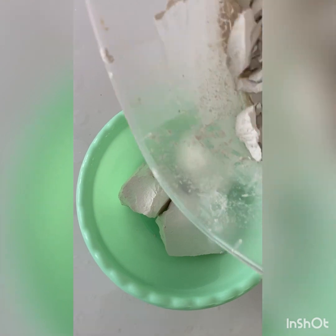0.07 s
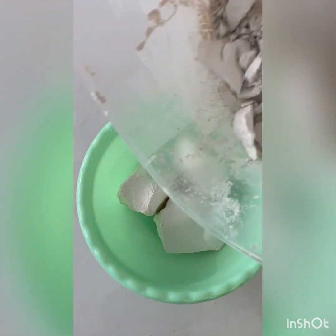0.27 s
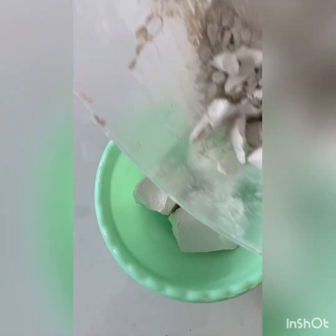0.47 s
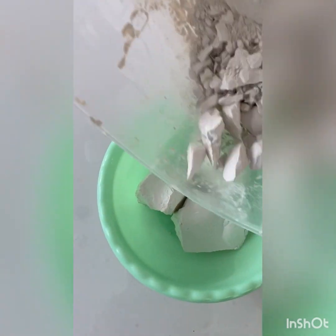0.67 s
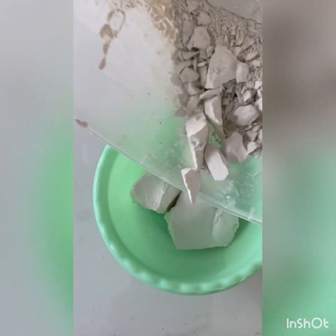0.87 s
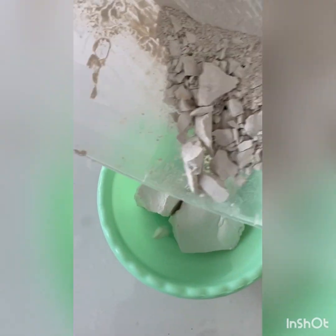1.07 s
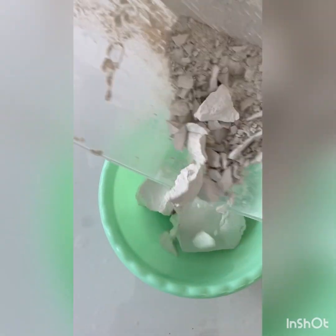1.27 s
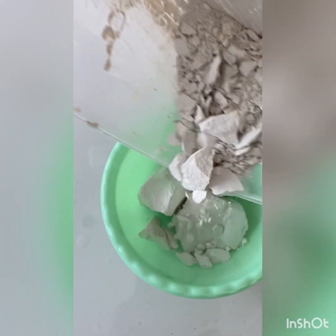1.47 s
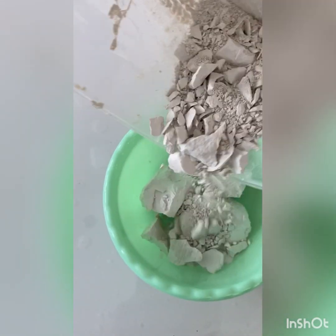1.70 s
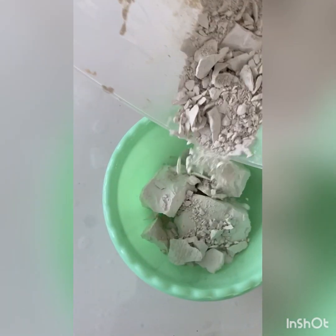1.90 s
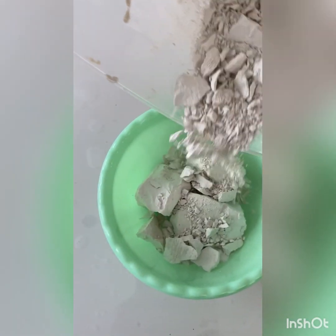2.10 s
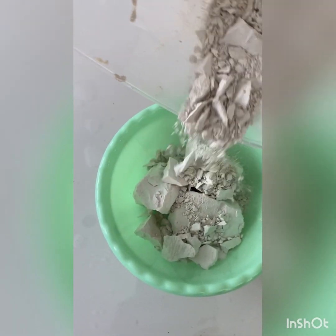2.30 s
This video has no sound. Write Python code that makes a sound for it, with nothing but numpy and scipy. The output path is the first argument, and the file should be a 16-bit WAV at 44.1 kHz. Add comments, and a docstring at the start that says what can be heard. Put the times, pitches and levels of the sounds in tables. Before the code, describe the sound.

Chalk pours into a plastic bowl, close to the microphone in a small room. Hollow knocks and gritty scrapes come first, then a dull thud and a busier clatter of pieces, ending with light ticking chips.

```python
"""Dry chalk pieces slide out of a tilted plastic tub and tumble into a plastic bowl, close by.
Lumps knock on the tub wall, where high notes travel faster than low ones, and one big lump thuds
into the bowl. Chalk clinks on chalk, small pieces rattle and scrape over the plastic, and tiny
chips tick onto the heap. A stereo microphone hears it all in a small room."""
import sys
import numpy as np
from scipy import signal
from scipy.fft import rfft, irfft
from scipy.io import wavfile
from scipy.ndimage import uniform_filter1d

SR = 44100
rng = np.random.default_rng(int(sys.argv[2]) if len(sys.argv) > 2 else 0)


def unload_audio(sound):
    """Save the sound as a 16-bit wav file, at the path given as the first command line argument."""
    columns = np.transpose(np.atleast_2d(sound))
    # keep every value between -1 and 1, then stretch to whole-number steps
    steps = np.round(np.clip(columns, -1, 1) * 32767)
    wavfile.write(sys.argv[1], SR, steps.astype(np.int16))


N = 108045

# The plastic's low and middle notes. Each row: pitch in Hz, seconds to fade by 60 dB, level in dB.
# All levels in the tables are relative: they set the balance between rows.
BOOM_NOTES = [(166.3, 0.084, -11.5), (351, 0.022, 1), (467, 0.01, 3)]
WALL_NOTES = [(622.5, 0.021, -6), (874, 0.017, -0.5), (970, 0.016, -6)]
# Where small pieces and finer crumbs ring. Each row: pitch in Hz, rough width in Hz, level in dB.
PIECE_BANDS = [(1412, 576, 4.5), (2112, 134, 5.5), (3314, 1110, 6.5), (4200, 920, -10.5)]
CRUMB_BANDS = [(5576, 484, 3), (7040, 1700, 0), (7790, 1530, -7), (8830, 2250, -2), (12300, 5200, -3),
               (13860, 950, -9)]
BEND_S = 0.003026  # travel time of a 1000 Hz ripple through the plastic


def knocks():
    """Lumps hit the tub: a crack, then the wall's clack, middle tone and boom in a quick fall."""
    # Each row: start in seconds, levels of boom, wall, clack and crack in dB, wall pitch in Hz.
    hits = [(0.2062, -15, -15.5, -38, -38, 810), (0.2476, -21, -20, -23, -28, 890),
            (0.2835, -23.5, -26, -27, -41, 770), (0.35, -38, -26, -19, -29, 920),
            (0.3748, -18.5, -11, -10, -17.5, 944), (0.4435, -44, -13.5, -28, -41, 845),
            (0.459, -29.5, -18, -23, -39, 850), (0.4805, -22, -3, -14, -10.5, 877),
            (0.498, -30, -10.5, -8, -21, 965), (0.526, -19.5, -7, -15.5, -31, 860),
            (0.539, -25, -19, -17, -21, 960), (0.564, -16.5, -5, -10.5, -27, 776),
            (0.5989, -23, -6.5, -17.5, -18, 932), (0.645, -17, -8.5, -19, -31, 1000),
            (0.675, -20, -10, -15, -25, 844), (0.8078, -16.5, -8.5, -16, -29, 900),
            (0.9185, -19.5, -17, -24, -28, 860), (0.947, -19.5, -26, -50, -44, 785),
            (1.0151, -18.5, -22.5, -46, -47, 840), (1.0538, -25, -10.5, -14.5, -15, 957),
            (1.1417, -18, -10, -25, -41, 875), (1.1599, -34, -16.5, -21, -18, 864),
            (1.3368, -27, -11.5, -33, -12.5, 872), (1.3555, -27, -8, -13, -11.5, 818),
            (1.5811, -27.5, -20.5, -18, -11.5, 930), (1.8, -27.5, -31, -17, -8, 1010),
            (1.8043, -38, -20.5, -30.5, -16, 1070), (1.9931, -27.5, -24, -38, -38, 760),
            (2.411, -47, -27, -23.5, -22.5, 930), (2.416, -34, -29, -23, -24.5, 870)]
    # The plastic's high notes. Each row: pitch in Hz, fade time in seconds, level in dB.
    clack_notes = [(1550, 0.0086, -0.5), (2040, 0.006, -1), (2530, 0.0034, 1)]
    # Where the crack rings. Each row: pitch in Hz, rough width in Hz, level in dB.
    snap_bands = [(3390, 1000, 12.5), (5620, 1500, 7), (6940, 1500, 5), (13600, 14000, -3)]
    cracks, ripples = np.zeros((2, N)), np.zeros((2, N))
    for start, boom_db, wall_db, clack_db, crack_db, wall_hz in hits:
        snap = resonate(crack(low_hz=1750, fade_s=0.0091), snap_bands)
        add(cracks, start, pan(undb(crack_db + 2.5) * snap))
        # Each spot on the wall has its own pitch.
        spot_notes = [(hz * wall_hz / WALL_NOTES[1][0], fade_s, db) for hz, fade_s, db in WALL_NOTES]
        for notes, db in (BOOM_NOTES, boom_db + 6), (spot_notes, wall_db + 1.5), (clack_notes, clack_db + 2.5):
            strike(ripples, start - .0007, notes, undb(db), detune=.04, scatter_db=1)
    return cracks + through_plastic(ripples)


def thud():
    """The big lump lands and shakes the whole bowl; the deepest notes arrive last."""
    # The bowl's notes. Each row: pitch in Hz, fade time in seconds, level in dB.
    bowl_notes = [(87, 0.059, -11), (121, 0.039, 4.5), (156, 0.063, -4.5), (271, 0.0283, -1),
                  (466, 0.011, -0.5), (794, 0.015, -8.5)]
    out = np.zeros((2, N))
    for hz, fade_s, db in bowl_notes:
        add(out, start=1.098, sound=2 * undb(db + 6) * ring(hz, fade_s, rise_cycles=0.78))
    return through_plastic(out)


def clinks():
    """Chalk hits chalk: it cracks, rings briefly, and its rough face touches again at once."""
    # Each row: start in seconds, pitch in Hz, ring level in dB, crack level in dB.
    hits = [(0.1125, 5100, -27, -25), (0.148, 5050, -24, -21), (0.2769, 3950, -23, -25),
            (0.3172, 2920, -30, -32), (0.5979, 3630, -9, -13.5), (0.6872, 3360, -30, -12.5),
            (1.0709, 6870, -21.5, -29), (1.198, 3060, -20, -36), (1.2175, 2180, -20, -17.5),
            (1.26, 3130, -24, -9.5), (1.3381, 3360, -3, -6.5), (1.3558, 3540, -6.5, -3.5),
            (1.3667, 7430, -19, -28), (1.4069, 3100, -7.5, -5.5), (1.409, 6800, -14, -9),
            (1.417, 7550, -15.5, -9), (1.4456, 3320, -27, -10.5), (1.47, 3610, -7, -16),
            (1.4927, 3640, -7, -17), (1.5288, 3470, -14.5, -39), (1.5804, 7500, -13, -7.5),
            (1.659, 3670, -12, -17), (1.6668, 3580, -16, -27), (1.707, 3830, -15, -24),
            (1.71, 3400, -14, -17), (1.7192, 3920, -19, -22), (1.728, 3570, -15, -20),
            (1.7817, 7430, -10.5, -10), (1.787, 7570, -22, -12), (1.8045, 2020, -12, -26),
            (1.825, 3370, -21, -14)]
    ring_s, crack_s, chatter_delay_s = 0.0088, .007, 0.00098
    out = np.zeros((2, N))
    for start, hz, ring_db, crack_db in hits:
        notes = [(hz, ring_s, 0), (hz * 1.104, ring_s * 0.85, -7), (hz * 3.3, ring_s / 2, -28)]
        strike(out, start, notes, undb(ring_db + 1.5), detune=0.01, scatter_db=-0.5)
        add(out, start, pan(undb(crack_db - 1) * crack(low_hz=1880, fade_s=crack_s)))
        chatter = resonate(crack(low_hz=2800, fade_s=crack_s), [(hz, hz * 0.36, 0)])
        add(out, start + chatter_delay_s, pan(3 * undb(ring_db - 2) * chatter))
    return out


def stream():
    """Pouring chalk rattles the plastic while small pieces and crumbs click against each other."""
    # Strength of the pour. Each row: time in seconds, levels of rattle, pieces and crumbs in dB.
    flow = [(0, -43, -47, -50.5), (.1, -35.5, -42.5, -50.5), (0.158, -30.5, -29.5, -40),
            (.3, -32.5, -35, -40.5), (.42, -28, -30.5, -40.5), (.55, -30.5, -32.5, -40),
            (.74, -29.5, -34.5, -41), (.9, -26, -33, -41.5), (.97, -35, -37.5, -41), (1.08, -19, -28, -35),
            (1.2, -23, -27.5, -36), (1.252, -24.5, -30, -42), (1.37, -23.5, -25.5, -33),
            (1.5, -27.5, -30, -36), (1.62, -29, -32, -35), (1.75, -36, -33, -35.5), (1.9, -35, -34, -39),
            (2.05, -33.5, -35, -38.5), (2.2, -33.5, -36.5, -40.5), (2.34, -38.5, -41.5, -40.5),
            (2.45, -32, -40, -46.5)]
    times, *levels = np.array(flow).T
    t = np.arange(N) / SR
    contacts = crunch(per_s=520, spread_db=4.5)
    drumming = undb(1.5) * rattle(per_s=420, spread_db=2.2)
    pieces = undb(2) * steady(resonate(contacts, PIECE_BANDS))
    crumbs = undb(5.5) * steady(resonate(contacts, CRUMB_BANDS))
    layers = drumming, pieces, crumbs
    pour = sum(layer * undb(np.interp(t, times, db)) for layer, db in zip(layers, levels))
    # The heap catches for a moment before the big lump falls.
    stall_db = -18 * np.exp(-((t - 1.036) / 0.017) ** 2)
    return undb(stall_db) * pour


def rattle(per_s, spread_db):
    """Many small pieces drum on the plastic at random times."""
    # The bowl's slow flexing. Each row: pitch in Hz, fade time in seconds, level in dB.
    flex_notes = [(79.6, 0.12, -13), (120.8, 0.14, -14.5), (164.4, 0.11, -9.5)]
    notes = flex_notes + [(hz, fade_s, db + 1) for hz, fade_s, db in BOOM_NOTES] + WALL_NOTES
    out = np.zeros((2, N))
    for when, size in rng.random((int(per_s * N / SR), 2)):
        gain = undb(spread_db * min(-np.log(1 - size), 3.5))
        strike(out, when * N / SR, notes, gain, detune=0.098, scatter_db=5.0, bend_s=BEND_S)
    return steady(out)


def crunch(per_s, spread_db):
    """Brittle grains touch at random, mostly softly, over a hiss of dust."""
    grains = np.zeros((2, N))
    for when, size in rng.random((int(per_s * N / SR), 2)):
        gain = undb(spread_db * min(-np.log(1 - size), 4))
        add(grains, when * N / SR, pan(gain * crack(low_hz=300, fade_s=.0055)))
    dust = undb(-5) * rng.standard_normal(N)
    return steady(grains) + dust


def slides():
    """The heap gives way in short, dense rushes of grit that also scrape the plastic."""
    # Each row: start in seconds, length in seconds, scrape level in dB, grit level in dB.
    rushes = [(0.231, 0.027, -23.5, -30), (0.346, 0.028, -23, -24.5), (0.45, 0.04, -17, -24.5),
              (0.52, 0.026, -22.5, -25), (0.627, 0.027, -23.5, -33), (0.662, 0.035, -22.5, -25),
              (0.999, 0.019, -24, -29.5), (1.045, 0.039, -32, -24), (1.148, 0.035, -17, -23.5),
              (1.257, 0.085, -24, -22.5), (1.588, 0.043, -28, -26), (1.975, 0.034, -26.5, -46),
              (2.249, 0.045, -28.5, -30)]
    # Where scraped plastic rings. Each row: pitch in Hz, rough width in Hz, level in dB.
    scrape_bands = [(389, 385, -2), (891, 210, 2)]
    attack_s, release_s = .003, .012
    contacts = crunch(per_s=900, spread_db=3.5)
    scrape = steady(resonate(contacts, scrape_bands))
    pieces = steady(resonate(contacts, PIECE_BANDS))
    crumbs = steady(resonate(contacts, CRUMB_BANDS))
    grit = steady(pieces + undb(0.5) * crumbs)
    t, out = np.arange(N) / SR, 0
    for start, length, scrape_db, grit_db in rushes:
        rise = np.clip((t - start) / attack_s, 0, 1)
        fall = np.clip((start + length - t) / release_s + .5, 0, 1)
        out = out + rise * fall * (undb(scrape_db) * scrape + undb(grit_db) * grit)
    return out


def chips():
    """Tiny hard chips land on the heap with a very short, bright tick."""
    # Each row: start in seconds, level in dB.
    landings = [(1.8711, -21), (1.887, -10), (1.8935, -18), (1.902, -22), (1.9148, -8), (1.937, -22),
                (2.0239, -7.5), (2.0855, -15), (2.0933, -11), (2.103, -6.5), (2.1105, -12.5), (2.1192, -14),
                (2.137, -13), (2.1472, -14), (2.15, -14), (2.172, -16), (2.189, -11.5), (2.2432, -25),
                (2.249, -12.5), (2.3598, -15), (2.3774, -23), (2.4057, -18), (2.4105, -14.5)]
    # Where a chip rings. Each row: pitch in Hz, rough width in Hz, level in dB.
    chip_bands = [(6950, 300, 0.5), (8020, 2300, 2.5), (14400, 8900, -0.5)]
    out = np.zeros((2, N))
    for start, db in landings:
        tick = crack(low_hz=2800, fade_s=0.0057)
        add(out, start, pan(undb(db) * (tick / 2 + 2 * resonate(tick, chip_bands))))
    return out


def strike(out, start, notes, gain, detune, scatter_db, bend_s=0):
    """One hit rings several notes, each a little off in pitch and level; bend_s delays low ones most."""
    for (hz, fade_s, db), (pitch_luck, level_luck) in zip(notes, rng.standard_normal((len(notes), 2))):
        note = ring(hz * np.exp(detune * pitch_luck), fade_s)
        level = 2 * gain * undb(db + scatter_db * level_luck)
        add(out, start + bend_s * np.sqrt(1000 / hz), pan(level * note))


def ring(hz, fade_s, rise_cycles=0.63):
    """One note of a struck object builds up over about one cycle, then dies away."""
    t, decay = fade(fade_s)
    rise = 1 - np.exp(-t * hz / rise_cycles)
    return np.sin(2 * np.pi * min(hz, SR * .45) * t) * decay * rise


def crack(low_hz, fade_s, rise_s=0.00091):
    """A brittle burst of noise builds as two faces press together; left and right differ a little."""
    t, decay = fade(fade_s)
    noise = rng.standard_normal(len(t)) + .33 * rng.standard_normal((2, len(t)))
    burst = noise * decay * (1 - np.exp(-(t / rise_s) ** 2))
    return 3.02 * signal.sosfilt(signal.butter(2, low_hz, "high", fs=SR, output="sos"), burst)


def through_plastic(sound, on_time_hz=5000):
    """Ripples bend the thin wall as they travel; four times the pitch takes half the time."""
    hz = np.fft.rfftfreq(2 * N, 1 / SR)
    lag_cycles = BEND_S * (2 * np.sqrt(1000 * hz) - hz * np.sqrt(1000 / on_time_hz))
    return shape(sound, np.exp(-2j * np.pi * lag_cycles))


def resonate(sound, bands):
    """Keep the bands of pitch where an object rings, filtering twice for steep edges."""
    out = 0
    for hz, width, db in bands:
        b, a = signal.iirpeak(min(hz, SR * .45), hz / (1.287 * width), fs=SR)
        out = out + undb(db) * signal.lfilter(b, a, signal.lfilter(b, a, sound))
    return out


def steady(sound):
    """Hold the average level at 1 while single clicks still stand out."""
    return sound / np.sqrt(uniform_filter1d(np.mean(sound ** 2, axis=0), size=3600) + 1e-12)


def pan(sound):
    """Each hit falls a little to the left or right."""
    return sound * undb(.6 * rng.standard_normal() * np.array([[1], [-1]]))


def fade(fade_s):
    """Give a time axis and a curve that falls by 60 dB along it."""
    t = np.arange(int(fade_s * SR)) / SR
    return t, np.exp(-np.log(1000) * t / fade_s)


def add(out, start, sound):
    """Mix a sound in at a start time in seconds."""
    i = int(np.clip(start * SR, 0, N - 1))
    out[..., i:i + sound.shape[-1]] += sound[..., :N - i]


def undb(db):
    """Turn decibels into a gain."""
    return 10 ** (np.asarray(db) / 20)


def along(points, hz):
    """Read between (Hz, value) points, with every octave equally wide."""
    pitches, values = np.array(points, float).T
    return np.interp(np.log(hz + 1), np.log(pitches), values)


def shape(sound, response):
    """Give each frequency its own gain and delay."""
    return irfft(rfft(sound, 2 * N) * response)[:, :N]


def direct_path(hz):
    """Sound reaches the microphone's two sides with slightly different level and timing."""
    # Each row: frequency in Hz, left level minus right level in dB.
    balance = [(60, 1), (110, -0.5), (200, -2), (380, -2), (700, -9.5), (1290, -4), (2380, 0), (4400, -2.5),
               (8120, 0.5), (15000, -0.5)]
    # Each row: frequency in Hz, how far the left side leads in radians.
    lead = [(30, 0), (100, -.15), (250, -.35), (600, -.4), (1100, .4), (2200, .1), (4200, 1.2), (5500, 1.0),
            (7200, .55), (9000, 2.3), (12000, 4.2), (14000, 6.1), (16000, 6.5)]
    sides = np.array([[.5], [-.5]])
    lean = undb(along(balance, hz) * sides)
    lean /= np.sqrt(np.mean(lean ** 2, axis=0))
    return lean * np.exp(1j * along(lead, hz) * sides)


def room_echo(hz, fade_s):
    """The small room adds a short tail whose low notes are alike on both sides."""
    t, decay = fade(fade_s)
    tail = rng.standard_normal((2, len(t))) * decay * (1 - np.exp(-t / 0.001))
    tail /= np.sqrt(np.sum(tail ** 2) / 2)
    echo = rfft(tail, 2 * N)
    apart = np.clip(hz / 1200, 0, 1)
    return apart * echo + np.sqrt(1 - apart ** 2) * echo[0]


def scene():
    """All the chalk sounds reach the microphone directly and by way of the room."""
    chalk = knocks() + thud() + clinks() + chips() + stream() + slides()
    hz = np.fft.rfftfreq(2 * N, 1 / SR)
    return shape(chalk, direct_path(hz) + undb(-16) * room_echo(hz, fade_s=.2))


def record(dry):
    """The microphone colours the sound, clips peaks that are too loud and cuts the highest treble."""
    # The microphone's tone. Each row: frequency in Hz, gain in dB.
    mic_tone = [(25, -47), (60, -6), (150, -3.5), (225, -4), (400, 2), (900, 1), (1250, -1.5), (2100, 6),
                (2600, -2.5), (3400, -0.5), (4600, -1), (7500, 2.5), (9000, 4), (10300, 5), (12000, 0),
                (15500, -8)]
    hz = np.fft.rfftfreq(2 * N, 1 / SR)
    coloured = shape(dry, undb(along(mic_tone, hz)))
    treble_cut = signal.ellip(8, .2, 70, 16200, fs=SR, output="sos")
    return signal.sosfilt(treble_cut, np.clip(coloured, -1, 1))


dry = scene()
out = record(dry)
unload_audio(out)
```